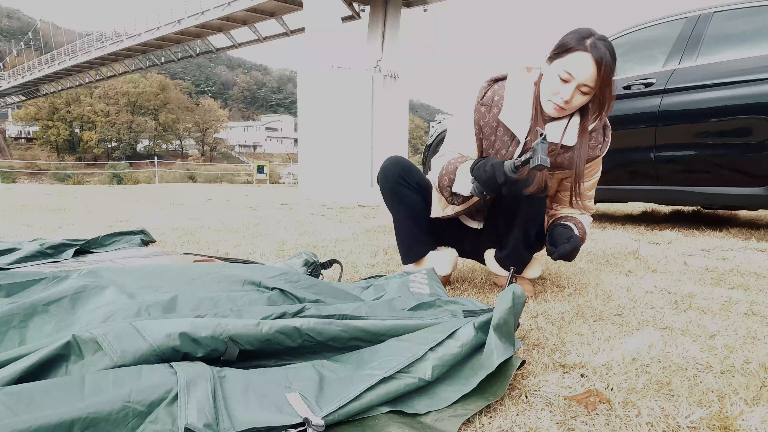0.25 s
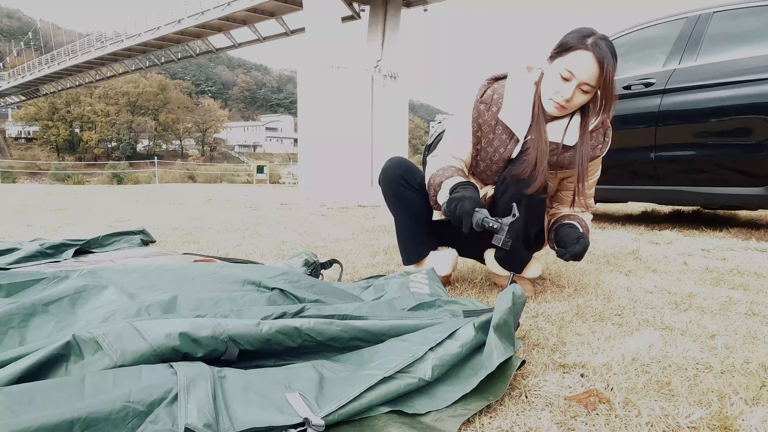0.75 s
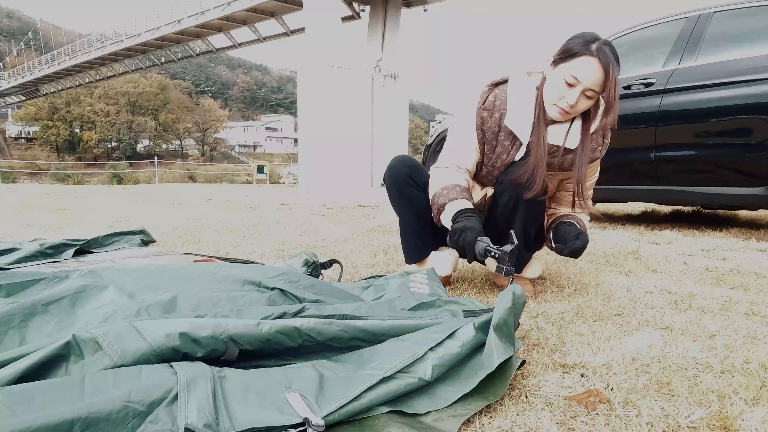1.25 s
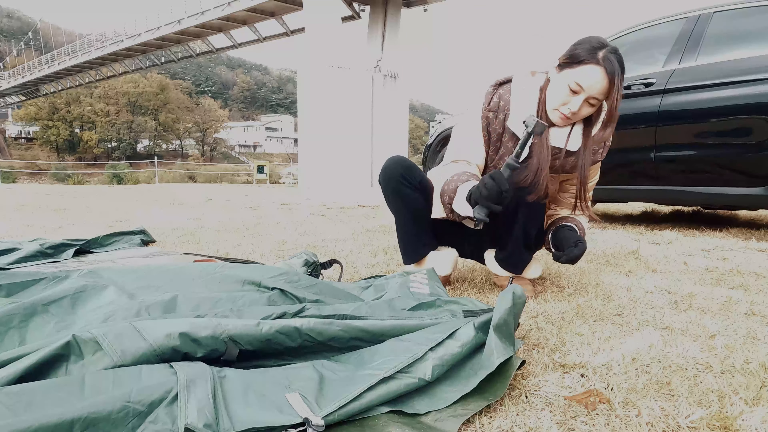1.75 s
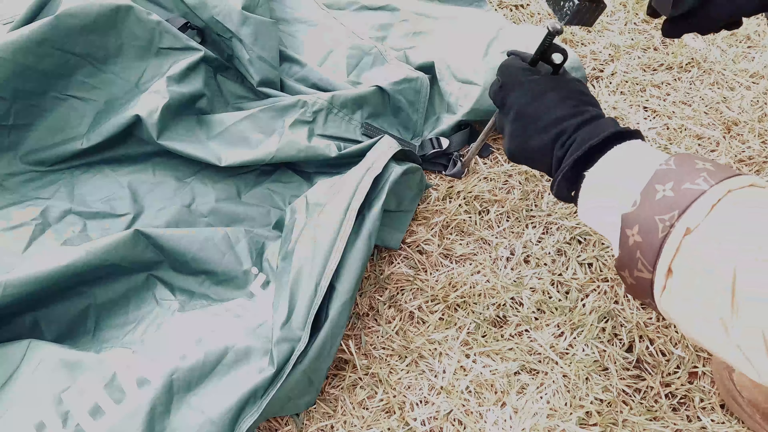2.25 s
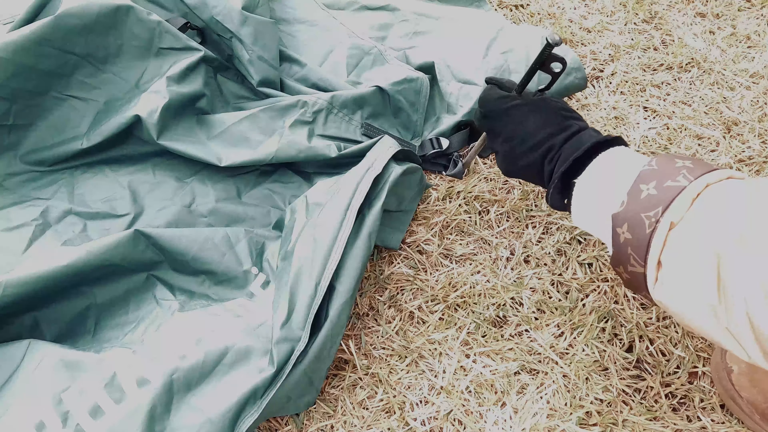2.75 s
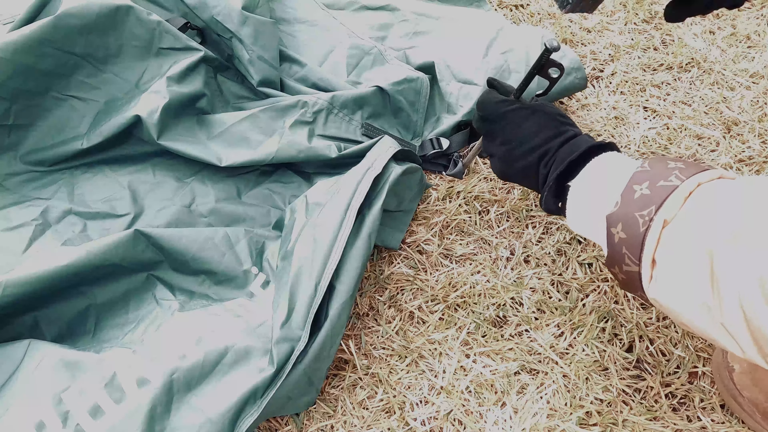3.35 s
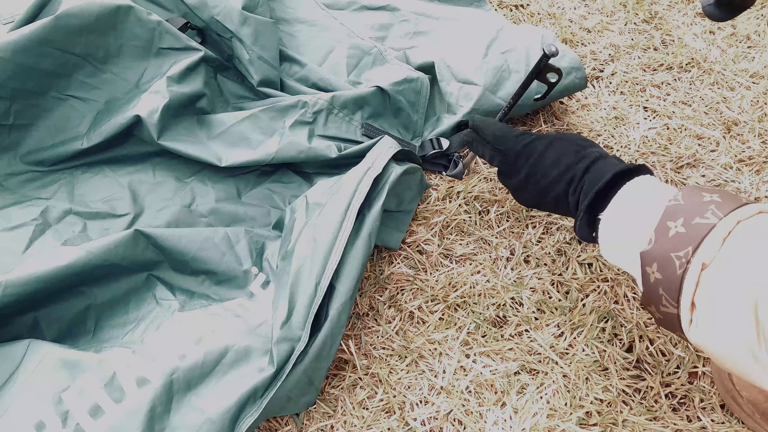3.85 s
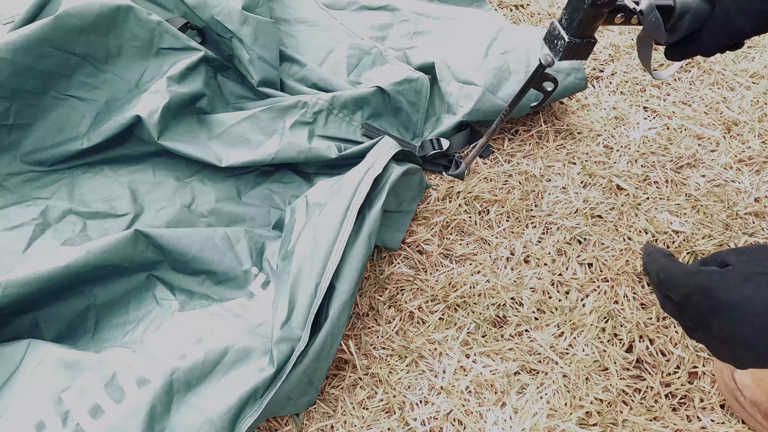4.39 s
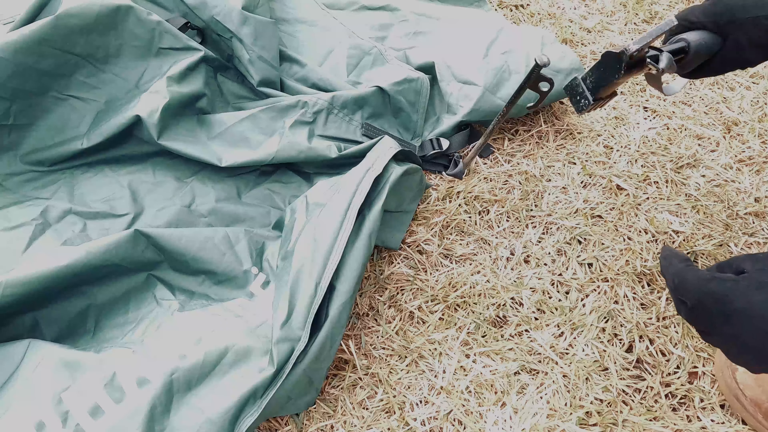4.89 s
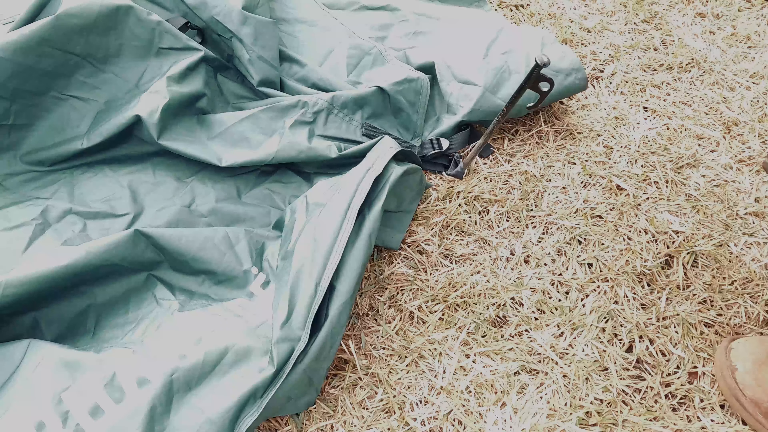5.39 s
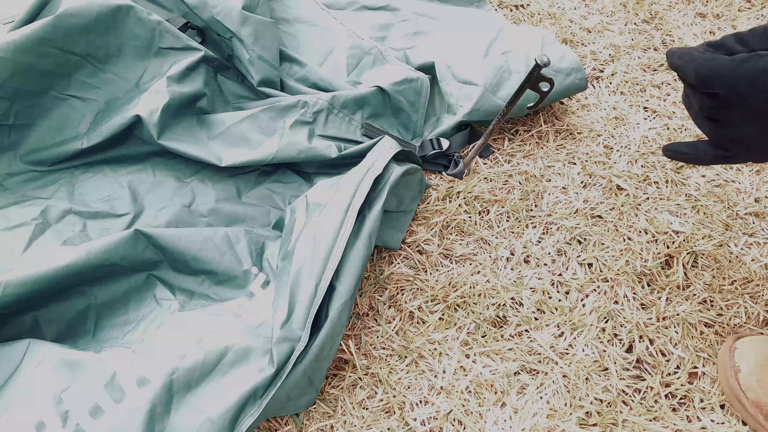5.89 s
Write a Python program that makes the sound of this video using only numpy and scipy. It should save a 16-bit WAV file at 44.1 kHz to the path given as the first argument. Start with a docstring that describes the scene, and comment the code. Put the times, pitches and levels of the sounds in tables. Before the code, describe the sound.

In an open field, a steel hammer drives a metal tent peg into hard turf close to the microphone, slightly right. Three blows at about 0.1, 0.7 and 1.3 seconds are crisp clacks with a loose rattling tail, the third softer. At 1.5 a dull low bump and scuff shake the microphone. From 1.9 a lumpy low breeze begins, with soft buffets until 2.7. Firmer blows follow at 2.3, 2.7, 3.0, 3.35, 3.7, 4.05, 4.45 and 4.95, each a bright clank with a short high ring, a low soil thud and very faint scattered echo. A smooth distant roar with hiss runs throughout, ducking briefly under loud hits. From 4.2 a sleeve swishes faintly. After the last blow, wind gusts and buffets swell near 5.7 to 6.0, and a tiny dry stalk snap ticks at 6.07.

```python
"""Over a distant hissing roar (shaped noise) and nearly calm air, a steel hammer drives a tent peg into turf close by.
Eleven blows, from 0.09 to 4.96 s: noisy clack, sine rings, soil thud, a rattle; faint echo clusters answer.
At 1.47 s something bumps the microphone (low modes and a scuff); from 1.88 s a lumpy noise breeze sets in,
with gusts and sine buffets; from about 4.2 s a sleeve swishes in noise swells; at 6.07 s a stalk snaps (noise tick).
The recorder's limiter ducks everything, background included, whenever the sound peaks above its ceiling."""
import sys
import numpy as np
from scipy import signal
from scipy.fft import rfft, irfft
from scipy.io import wavfile
from scipy.ndimage import uniform_filter1d, minimum_filter1d

SR = 44100
rng = np.random.default_rng(int(sys.argv[2]) if len(sys.argv) > 2 else 0)


def store_wav(level_fs):
    """Save 16-bit WAV to argv[1]."""
    pcm = np.round(np.clip(np.atleast_2d(level_fs), -1, 1) * 32767)
    wavfile.write(sys.argv[1], SR, pcm.T.astype(np.int16))


N = 270333
TIME = np.arange(N) / SR


def from_db(db):
    """Decibels to gain."""
    return 10 ** (np.asarray(db) / 20)


def rms_one(x):
    """Scale to rms 1."""
    return x / np.sqrt(np.mean(x ** 2) + 1e-20)


def clock(length_s_divisor):
    """Time axis in seconds, lasting one second over the divisor."""
    return np.arange(SR // length_s_divisor) / SR


def sine(hz, t):
    """Pure tone that starts at a zero crossing."""
    return np.sin(2 * np.pi * hz * t)


def dying(t, t60):
    """Exponential decay, 60 dB down at t60."""
    return np.exp(-np.log(1000) * t / t60)


def rising(t, t60):
    """Soft onset: the gap to full strength closes by 60 dB at t60."""
    return 1 - dying(t, t60)


def held(t, hold_s, t60):
    """Full strength for a while, then an exponential decay."""
    return dying(np.maximum(t - hold_s, 0), t60)


def swells(rows):
    """Summed power of smooth swells (crest, level, length); the length is taken at half power."""
    return sum(from_db(db) ** 2 * .5 ** ((2 * (TIME - s) / length) ** 2) for s, db, length in rows)


def flutter(rate_hz):
    """Slow random wander of spread 1, with rate_hz new targets a second."""
    knots = rng.standard_normal(1000)
    return rms_one(np.interp(TIME * rate_hz, np.arange(len(knots)), knots))


def at_hz(points, size):
    """A (frequency, value) table read at the FFT bins of a sound of this size."""
    hz, value = np.transpose(points)
    bins_hz = np.fft.rfftfreq(size, 1 / SR)
    return np.interp(np.log(bins_hz + 1), np.log(hz), value)


def noise(colour, size, side_db):
    """Stereo noise of a given spectrum, mostly alike in both channels; rms 1."""
    white = rng.standard_normal((2, size))
    mid, side = irfft(rfft(white) * from_db(at_hz(colour, size)), size)
    return rms_one(mid + from_db(side_db) * side * [[1], [-1]])


def coloured(x, colour):
    """Causal (minimum-phase) filter with the gain of a (frequency, level) table."""
    size = len(x)
    cepstrum = irfft(np.log(from_db(at_hz(colour, size))), size)
    # folding the cepstrum puts the energy as early as possible
    cepstrum[1:size // 2] *= 2
    cepstrum[size // 2:] = 0
    return irfft(rfft(x) * np.exp(rfft(cepstrum)), size)


def butter(x, hz, kind, order=2):
    """Causal Butterworth filter."""
    return signal.sosfilt(signal.butter(order, hz, kind, fs=SR, output="sos"), x)


def panned(x, pan_db):
    """Left louder than right by pan_db."""
    return x * from_db(pan_db * np.array([[.5], [-.5]]))


def add(out, s, sound):
    """Mix a sound in at a time."""
    at = round(s * SR)
    out[..., at:at + sound.shape[-1]] += sound[..., :N - at]


# Hammer blows; where the head lands decides which rings speak:
# (time [s], clack level [dB], treble tilt [dB per octave], low ring [dB re clack], middle ring [dB re clack],
#  peg ring before its onset [dB], soil thud before its onset [dB], soil pitch [Hz], rattle at its start [dB])
BLOWS = [(0.0877, -8, 3.8, -22, -9.5, -23.5, -8.5, 115, -19),
         (0.691, -9, 2.5, -0.5, -48, -13, 2, 113.6, -17.5),
         (1.303, -16.5, 1.8, -12.5, -27, -14.5, -4.5, 127.3, -28.5),
         (2.3203, -6.5, 0.5, 2, -9.5, -4, 1.5, 173.3, -66),
         (2.6680, -5.5, 2.5, -17.5, -9, -3.5, 1, 187, -34),
         (3.0101, -8.5, 1.3, -26, 4.5, -15.5, -4, 136, -41),
         (3.3472, -4.5, -0.2, -15.5, -28, 6, 3.5, 174, -51.5),
         (3.6973, -8.5, 1.5, 1, -5.5, -17, -3, 138, -36.5), (4.0573, -8.5, 0.5, 2, -22, -12, 0.5, 132, -30),
         (4.4532, -3.5, 1.1, -4, -14, -10, 5, 138, -37),
         (4.9552, -5, -0.8, -2.5, 4.5, -14.5, 5.5, 152.2, -46)]
SOIL_LAG_S, REBOUND_S = 0.0028, 0.013   # the soil springs back, then the head rebounds and the peg rattles


def hammering():
    """Every blow: the clack, the peg ringing on, the soil springing back, and a rattle while the peg is still loose."""
    out, t = np.zeros(N), clock(3)
    for s, clack_db, tilt_db, low_db, middle_db, ring_db, thud_db, soil_hz, rattle_db in BLOWS:
        steel = from_db(clack_db) * clack(t, tilt_db, [low_db, middle_db])
        add(out, s, steel + from_db(ring_db) * peg_ring(t) + turf_boom(t))
        add(out, s + SOIL_LAG_S, from_db(thud_db) * soil_thud(t, soil_hz))
        add(out, s + REBOUND_S, from_db(rattle_db) * rattle(t))
    return out


# Spectrum of the steel chatter, before the tilt of each blow: (frequency [Hz], relative level [dB per Hz])
CHATTER_COLOUR = [(300, -35), (560, 6.5), (760, -3.5), (1000, 9.5), (1450, 10.5), (1650, 1.5), (2100, 11.5),
                  (2750, 6), (3600, 9.5), (4400, 1.5), (6000, 1), (8300, -0.5), (9200, -10), (11000, -10.5),
                  (14000, -19)]
# Low and middle ring of hammer head and hook: (frequency [Hz])
CLACK_HZ = [1990, 4930]
# Further short rings of hammer head and hook, with the same levels re clack on every blow:
# (frequency [Hz], level [dB re clack])
CLINKS = [(2290, -13.5), (5800, -14), (7895, -5.5), (9870, -13.5), (13000, -32)]
CONTACT_S, CHATTER_T60_S = 0.00078, 0.019   # full chatter while the head presses on the peg, then it stops fast
GRIT_DB, GRIT_T60_S = -37.5, 0.11   # a faint tail of grit, relative to the full chatter
SECOND_TOUCH_S = (0.0014, 0.0039)   # the peg kicks back against the head somewhere in this range
CLACK_T60_S = 0.023


def clack(t, tilt_db, rings_db, crack_db=13, second_db=12):
    """Steel meets steel: a hard contact and a second touch amid a few ms of dense chatter, and a few short rings."""
    chatter = held(t, CONTACT_S, CHATTER_T60_S) + from_db(GRIT_DB) * dying(t, GRIT_T60_S)
    force = rng.standard_normal(len(t)) * chatter
    force[0] -= from_db(crack_db)
    force[int(rng.uniform(*SECOND_TOUCH_S) * SR)] -= from_db(second_db)
    # each contact is brief, so the force is spread evenly over all pitches
    spectrum = rfft(force)
    smooth_power = uniform_filter1d(np.abs(spectrum) ** 2, size=241)
    # only the first half is kept: the flattening can wrap round to the end
    force = irfft(spectrum / np.sqrt(smooth_power), len(t)) * (t < t[-1] / 2)
    tilted = [(hz, db + tilt_db * np.log2(hz / 4000)) for hz, db in CHATTER_COLOUR]
    body = coloured(force, tilted)
    ring_rows = [*zip(CLACK_HZ, rings_db), *CLINKS]
    rings = sum(from_db(db) * sine(hz, t) for hz, db in ring_rows)
    # the first 5 ms of the body set its level
    return body / np.std(body[:SR // 200]) + rings * dying(t, CLACK_T60_S)


def peg_ring(t, peg_hz=4761, t60=0.076, onset_t60=0.0055):
    """The peg's main ring: one mode that speaks softly and dies away."""
    return sine(peg_hz, t) * dying(t, t60) * rising(t, onset_t60)


def soil_thud(t, soil_hz, soil_t60=0.05, onset_t60=0.013, earth_db=-16, earth_t60=0.13):
    """The soil springs back as a short low swing, with a dull grain of earth in low noise."""
    swing = sine(soil_hz, t) * dying(t, soil_t60) * rising(t, onset_t60)
    grain = rms_one(butter(rng.standard_normal(len(t)), [45, 240], "band"))
    return swing + from_db(earth_db) * grain * dying(t, earth_t60)


def turf_boom(t, level_db=-21, boom_hz=59.36, t60=0.41):
    """The slow boom of the turf: one low mode, equally strong on every blow."""
    return from_db(level_db) * sine(boom_hz, t) * dying(t, t60)


# Spectrum of the peg's rattle: (frequency [Hz], relative level [dB per Hz])
RATTLE_COLOUR = [(200, 7), (380, 23), (700, -0.5), (1500, -1.5), (5000, -1), (7000, -2), (7900, 5),
                 (9000, -8.5), (13000, -15), (15000, -36)]


def rattle(t, t60=0.064):
    """The loose peg rattles after the rebound: a dying burst of coloured noise."""
    return rms_one(coloured(rng.standard_normal(len(t)), RATTLE_COLOUR)) * dying(t, t60)


# Level difference of the blows between the ports: (frequency [Hz], left minus right [dB])
BLOW_BALANCE = [(100, -1), (1000, -3.5), (3000, -3), (6000, -5), (8000, -1.5), (11000, 2), (14000, -2)]
# Phase difference of the blows between the ports: (frequency [Hz], left lead [rad])
BLOW_PHASE = [(100, -.05), (1500, -.35), (3400, -.9), (5500, -.5), (7000, .15), (11800, 0), (12300, 1.8),
              (13000, 6.28)]


def two_ports(x):
    """The peg stands to the right: over most of the range the left port hears it later and softer."""
    # each port takes half of the difference, in opposite directions
    half = from_db(at_hz(BLOW_BALANCE, N) / 2) * np.exp(.5j * at_hz(BLOW_PHASE, N))
    return irfft(rfft(x) * np.array([half, 1 / half]), N)


# Spectrum of the echo: (frequency [Hz], relative level [dB])
ECHO_COLOUR = [(300, -2.5), (2000, -3.5), (4000, -7), (4760, 0), (5500, 1), (6600, 7.5), (8300, -1),
               (9500, -6.5), (13000, 4)]
# Scatter from the tent, the nearby ground and two far rows of trees:
# (delay of the crest [s], relative level [dB], decay t60 [s])
REFLECTORS = [(0.013, 4.5, 0.2), (.046, -5.5, 0.11), (.118, -5, .17), (0.147, -9, 0.051)]
ECHO_BUILD_SHARE = 0.54   # each cluster builds up by 60 dB over this share of its delay


def field_echo(x, level_db=-31.5):
    """Faint bright scatter: each reflector returns a cluster that builds up and dies away."""
    t = clock(3)
    clusters = np.zeros(len(t))
    for delay, db, t60 in REFLECTORS:
        build = dying(np.maximum(delay - t, 0), ECHO_BUILD_SHARE * delay)
        clusters += from_db(db) * held(t, delay, t60) * build
    response = noise(ECHO_COLOUR, len(t), side_db=-2.5) * clusters
    response = from_db(level_db) * rms_one(response) / np.sqrt(len(t))
    return signal.fftconvolve(x[None], response, axes=1)[:, :N]


# Wobble of the microphone's mount, each mode before the shared onset and swing envelope:
# (frequency [Hz], level [dB], decay t60 [s])
BUMP_MODES = [(31.2, -10.5, 0.41), (64, -12, 0.23), (95, -25.5, 0.33), (196.3, -27, 0.32)]
# Spectrum of the scuff: (frequency [Hz], relative level [dB per Hz])
BUMP_COLOUR = [(40, 0.5), (230, -7), (420, -14), (950, -16), (1800, -31.5), (5000, -43.5), (9000, -52),
               (14000, -71)]
BUMP_S = 1.4665
# the wobble fades slowly at first, then faster as friction stops it
BUMP_FREE_S, BUMP_STOP_T60_S, BUMP_SUSTAIN_DB = 0.14, 0.39, 10.5


def bump(scuff_db=-19, scuff_t60=0.24, scuff_onset_t60=0.012, onset_t60=0.023):
    """A dull knock on the microphone's mount, which wobbles on for a few cycles."""
    out, t = np.zeros((2, N)), clock(2)
    wobble = sum(from_db(db) * sine(hz, t) * dying(t, t60) for hz, db, t60 in BUMP_MODES)
    # this gain offsets part of the modes' own decay
    sustain = from_db(BUMP_SUSTAIN_DB * np.minimum(t / BUMP_FREE_S, 1))
    swing = sustain * held(t, BUMP_FREE_S, BUMP_STOP_T60_S)
    scuff = from_db(scuff_db) * noise(BUMP_COLOUR, len(t), side_db=-12.0) * dying(t, scuff_t60)
    add(out, BUMP_S, wobble * swing * rising(t, onset_t60) + scuff * rising(t, scuff_onset_t60))
    return out


# Single low buffets on the microphone: (time [s], level before decay and onset [dB], frequency [Hz])
BUFFETS = [(2.03, -8, 38), (2.188, -11.5, 87), (2.595, -13, 109), (2.639, -11, 59), (5.675, -17, 64.5),
           (5.854, -7, 125), (6.017, -11, 150)]


def buffets(t60=0.036, onset_t60=0.0063):
    """Each eddy that hits the ports is a soft push with a few quickly dying swings after it."""
    out, t = np.zeros(N), clock(5)
    for s, db, hz in BUFFETS:
        add(out, s, from_db(db) * sine(hz, t) * dying(t, t60) * rising(t, onset_t60))
    return out


# Spectrum of the wind on the ports: (frequency [Hz], relative level [dB per Hz])
WIND_COLOUR = [(15, -4.5), (30, 5.5), (60, -1.5), (110, -3.5), (200, -14.5), (400, -23), (1000, -38),
               (4000, -108)]
# Gusts on top of the breeze: (time of the crest [s], level [dB], length [s])
GUSTS = [(2.05, -27.5, 0.14), (2.36, -26.5, 0.17), (2.61, -22, 0.037), (5.4, -31, .3), (5.9, -25, 0.48)]
# calm at first, then a steady breeze sets in
CALM_DB, BREEZE_DB, BREEZE_START_S, BREEZE_RISE_S = -45, -34.5, 1.88, 0.048


def wind(lumps_db=3.5, pan_db=-2.5):
    """Lumpy wind at the ports: calm, then a breeze with a few gusts."""
    breeze = from_db(BREEZE_DB) * np.clip((TIME - BREEZE_START_S) / BREEZE_RISE_S, 0, 1)
    strength = np.sqrt(from_db(CALM_DB) ** 2 + breeze ** 2 + swells(GUSTS))
    lumpy = rms_one(noise(WIND_COLOUR, N, side_db=-8) * from_db(lumps_db * flutter(35)))
    return panned(strength * lumpy, pan_db)


# The sleeve swishes as the arm moves: (time of the crest [s], level before the rub [dB], length [s])
SWISHES = [(4.19, -49.5, 0.11), (4.42, -50, 0.046), (4.89, -48, 0.073), (5.32, -46.5, 0.16),
           (5.76, -51, 0.23)]
# Spectrum of the cloth: (frequency [Hz], relative level [dB per Hz])
SWISH_COLOUR = [(500, 9), (2000, 8.5), (4000, 5), (7600, -0.5), (8800, -8), (12000, -15), (15000, -30)]


def sleeve(rub_db=1, pan_db=-1):
    """Cloth slides on cloth: one slightly uneven swell for each move of the arm."""
    cloth = noise(SWISH_COLOUR, N, side_db=-6) * from_db(rub_db * flutter(130))
    return panned(np.sqrt(swells(SWISHES)) * cloth, pan_db)


def stalk(snap_s=6.073, level_db=-32):
    """A dry stalk snaps: one tiny bright tick of dying noise, its level set ahead of the band filter."""
    out, t = np.zeros(N), clock(20)
    snap = butter(rng.standard_normal(len(t)) * dying(t, 0.015), [5000, 10000], "band")
    add(out, snap_s, from_db(level_db) * snap)
    return out


# Level of the distant roar, which its hiss follows: (time [s], level [dB])
DISTANCE_LEVEL = [(0, -38.5), (1.25, -37.5), (1.7, -41.5), (2.0, -36.5), (2.3, -38), (2.8, -41.5),
                  (3.6, -45), (4.5, -41.5), (5.1, -43.5), (6.13, -36.5)]
# Spectrum of the roar: (frequency [Hz], relative level [dB per Hz])
ROAR_COLOUR = [(47, -30), (80, 10), (114, 1), (141, 4.5), (180, 2.5), (224, 5), (255, 3), (285, 0),
               (574, -6.5), (1080, -5), (1910, -16), (4310, -29.5), (10100, -81), (13400, -66),
               (15000, -70.5)]
# Spectrum of the hiss: (frequency [Hz], relative level [dB per Hz])
HISS_COLOUR = [(500, -8), (2000, 9.5), (4000, 5), (7600, -5.5), (8800, -12.5), (12000, -20), (15000, -37.5)]


def distance(hiss_db=-15.5):
    """A smooth far roar with a soft hiss above it; both rise and fall together."""
    level = from_db(np.interp(TIME, *np.transpose(DISTANCE_LEVEL)))
    roar = noise(ROAR_COLOUR, N, side_db=-12)
    hiss = from_db(hiss_db) * noise(HISS_COLOUR, N, side_db=-3.5)
    return level * (roar + hiss)


def scene():
    """Blows and their echo over the open field, with bump, wind, cloth, stalk and distance."""
    blows = hammering()
    hammer = two_ports(blows) + field_echo(blows)
    return hammer + bump() + buffets() + wind() + sleeve() + stalk() + distance()


def limiter(x, ceiling_db=-2.5, hold_s=0.04, release_db_per_s=125):
    """The gain drops within a millisecond around a peak, holds, then climbs back; what still sticks out is clipped."""
    peak_db = 20 * np.log10(np.abs(x).max(axis=0) + 1e-9)
    over = np.maximum(peak_db - ceiling_db, 0)
    hold = 2 * int(hold_s * SR / 2) + 1
    over = -minimum_filter1d(-over, size=hold, origin=hold // 2)   # running maximum of the recent past
    release = release_db_per_s * TIME
    cut = np.maximum.accumulate(over + release) - release
    cut = uniform_filter1d(-minimum_filter1d(-cut, size=25), size=45)   # looks a little ahead
    return np.clip(x * from_db(-cut), -.93, .93)


def record(dry, mic_top_hz=13600, cutoff_hz=16800):
    """The microphone loses the highest treble, the limiter catches the peaks, the top is cut."""
    limited = limiter(butter(dry, mic_top_hz, "low", order=8))
    return signal.sosfilt(signal.cheby2(14, 70, cutoff_hz, fs=SR, output="sos"), limited)


dry = scene()
out = record(dry)
store_wav(out)
```